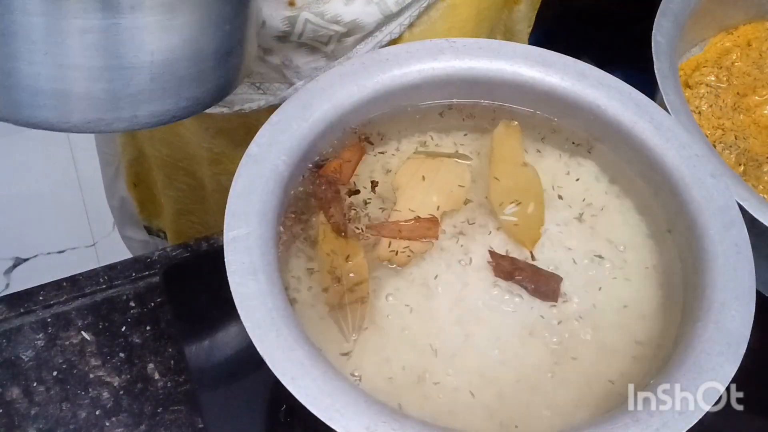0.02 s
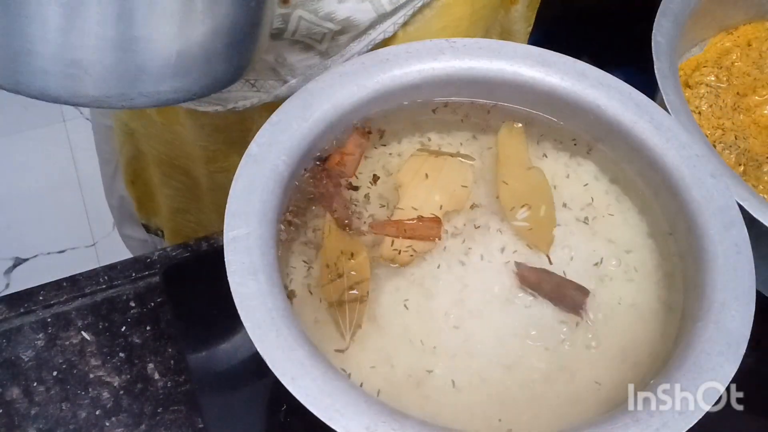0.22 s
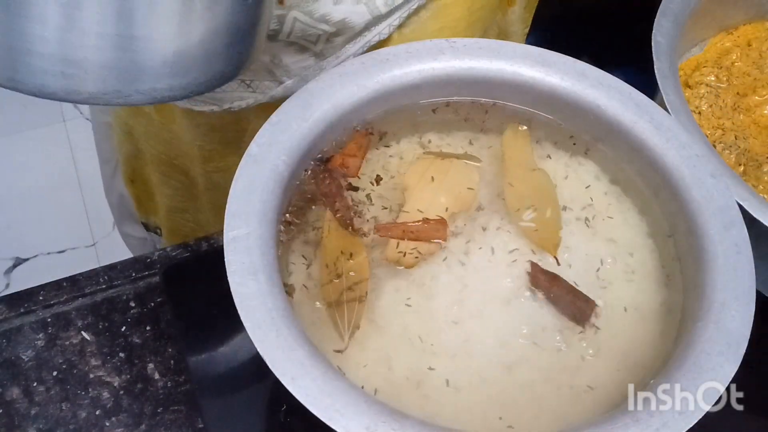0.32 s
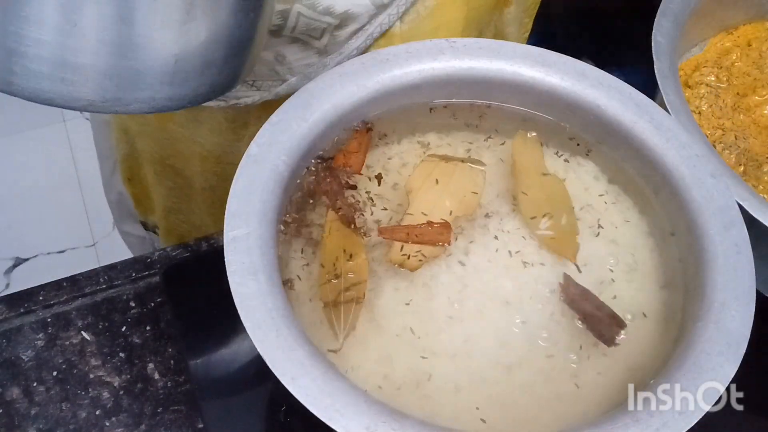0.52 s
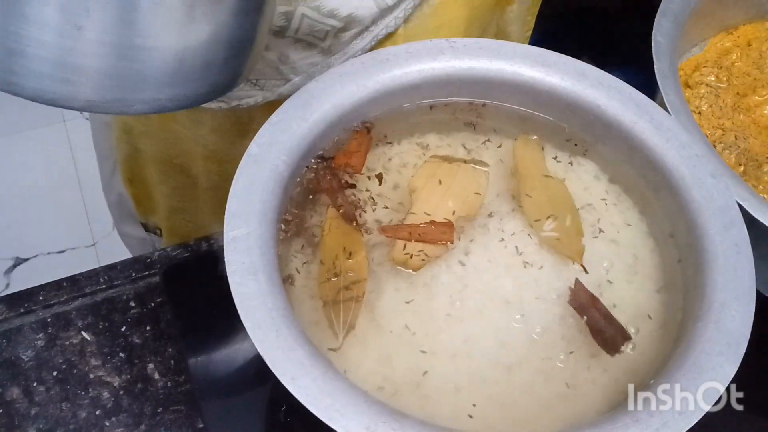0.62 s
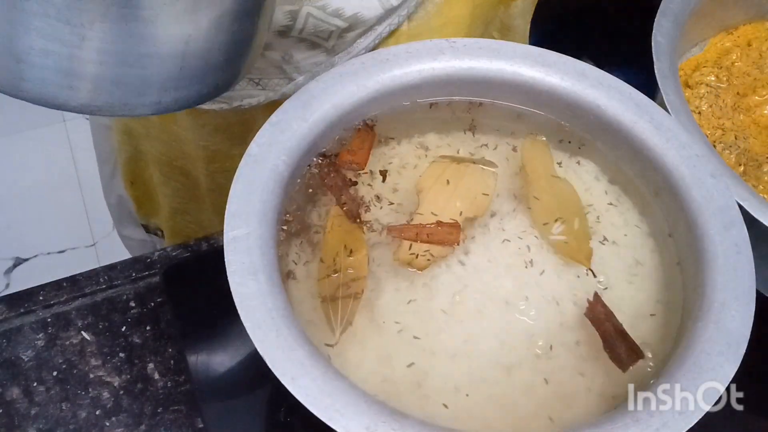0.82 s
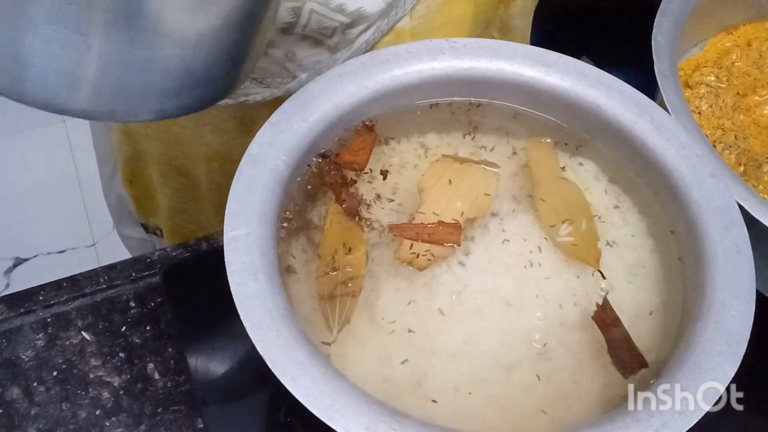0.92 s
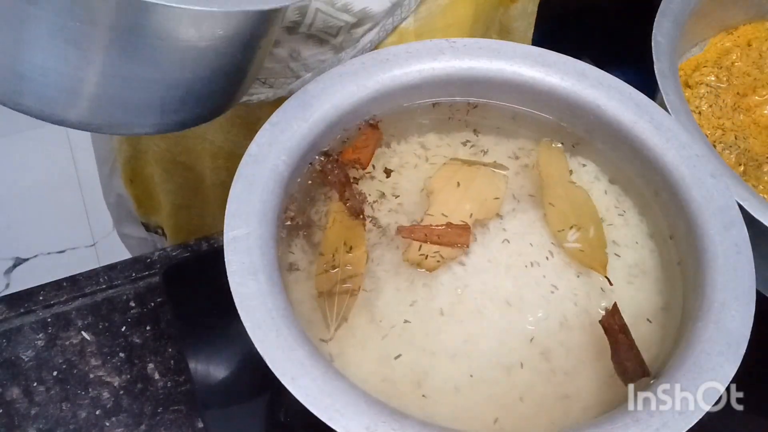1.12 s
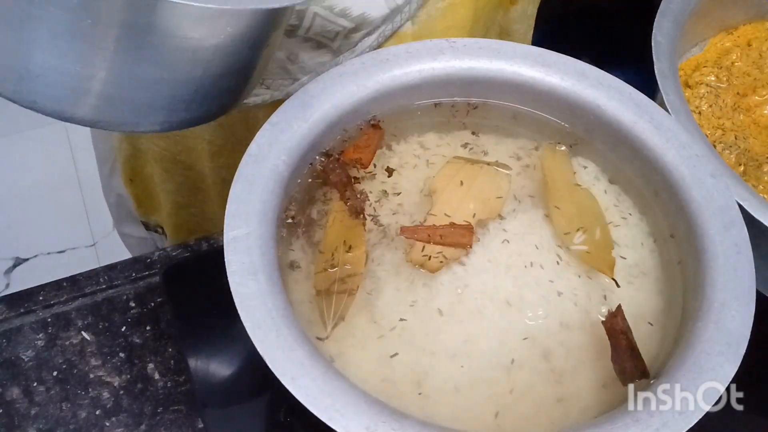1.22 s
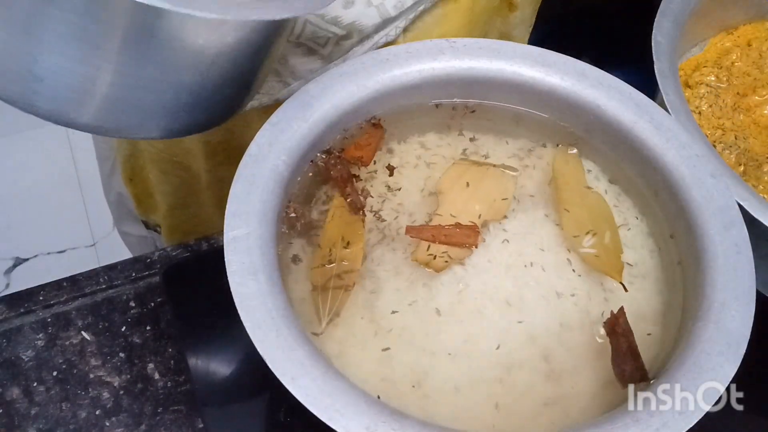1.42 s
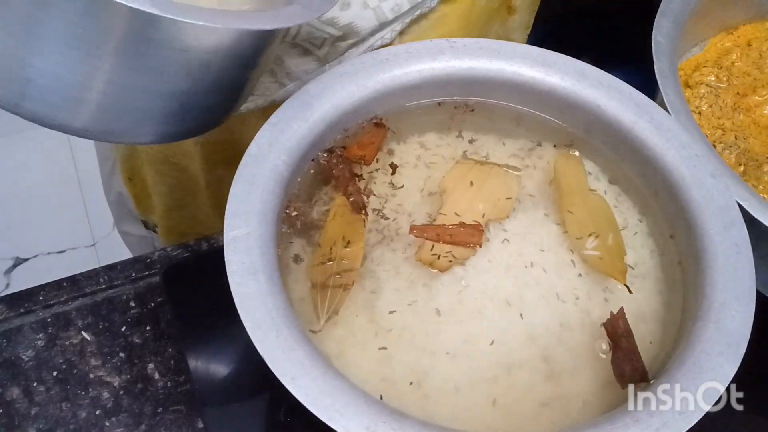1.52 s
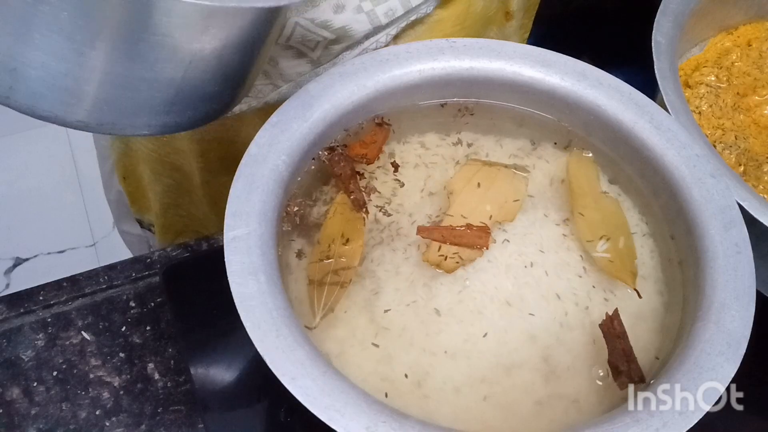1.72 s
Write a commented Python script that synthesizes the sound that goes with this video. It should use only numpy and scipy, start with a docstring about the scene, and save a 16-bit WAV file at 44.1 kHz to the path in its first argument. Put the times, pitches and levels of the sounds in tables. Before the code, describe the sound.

Metal cooking pots clink, scrape and clank together, then wet rice slides inside one.

```python
"""Metal cooking pots are handled close by in a small, hard-walled kitchen.
Over room air, a low rumble and a faint far whistle, one pot clinks against another and both ring.
It is dragged, its base grating and its hollow singing, then clanks down twice among lighter knocks.
Wet rice scrapes and slides in it, the grains rasping on metal and stirring more hollow notes.
A few light rubs follow."""
import sys
import numpy as np
from scipy import signal
from scipy.fft import rfft, irfft
from scipy.io import wavfile
from scipy.ndimage import uniform_filter1d

SR = 44100
rng = np.random.default_rng(int(sys.argv[2]) if len(sys.argv) > 2 else 0)


def put_to_file(sound):
    """Save the sound as 16-bit audio at rate SR, in the file named by the first command-line argument."""
    columns = np.atleast_2d(sound).T  # one column per channel
    safe = np.clip(columns, -1, 1)
    whole_steps = np.round(safe * 32767)
    wavfile.write(sys.argv[1], SR, whole_steps.astype(np.int16))


N = 79380
T = np.arange(N) / SR
HZ = np.fft.rfftfreq(N, 1 / SR)


def amp(db):
    """Decibels to gain."""
    return 10 ** (np.asarray(db) / 20)


def unit(x):
    """Scales to rms 1."""
    return x / np.sqrt(np.mean(x ** 2) + 1e-20)


def read(points, hz):
    """Reads a curve on a log-frequency axis."""
    freqs, values = np.transpose(points)
    return np.interp(np.log(hz + 1), np.log(freqs + 1), values)


def swell(points):
    """A fader ride through (time_s, level_db) points, silent outside them."""
    times, db = np.transpose(points)
    return amp(np.interp(T, times, db)) * (T >= times[0]) * (T <= times[-1])


def add(mix, start_s, sound):
    """Mixes a sound in at a time."""
    part = mix[:, max(round(start_s * SR), 0):][:, :sound.shape[-1]]
    part += sound[..., :part.shape[1]]


def through(x, gain):
    """Applies a gain per frequency."""
    return irfft(rfft(x) * gain, N)


def colour(x, points):
    """Equalises by a (freq_hz, gain_db) curve."""
    return through(x, amp(read(points, HZ)))


def die_away(x, decays):
    """Lets each (freq_hz, t60_s) band fade at its own rate."""
    freqs, t60s = np.transpose(decays)
    bands = [through(x, read(np.c_[freqs, solo], HZ)) for solo in np.eye(len(freqs))]
    return sum(band * amp(-60 * T / t60) for band, t60 in zip(bands, t60s))


# How alike left and right are: freq_hz, correlation
LIKENESS = [(60, 0.98), (300, 0.89), (680, 0.62), (1100, -0.33), (2200, -0.21), (5000, -0.12),
            (12000, 0.067)]
def spread(x):
    """Makes two unrelated channels alike in the bass."""
    left, other = rfft(x)
    same = np.clip(read(LIKENESS, HZ), -.99, .99)
    return irfft(np.array([left, same * left + np.sqrt(1 - same ** 2) * other]), N)


def stereo_phase(hz):
    """The phases at which a note reaches the left and the right."""
    apart = np.arccos(np.clip(read(LIKENESS, hz), -1, 1)) * rng.choice([-1, 1])
    return 2 * np.pi * rng.random() + np.array([[0], [apart]])


def noise():
    """Stereo white noise."""
    return spread(rng.standard_normal((2, N)))


# Room air EQ: freq_hz, gain_db
AIR_EQ = [(20, -23), (48, 0), (110, 0.5), (200, -6), (400, -9), (650, -16), (1400, -11), (2300, -25.5),
          (3500, -13.5), (6000, -25), (9000, -30), (13000, -23), (16000, -40)]
# Rumble resonances: pitch_hz, level_db, width_hz
RUMBLE_MODES = [(51, -22.5, 8.8), (78, -4, 13)]
# Rumble EQ: freq_hz, gain_db
RUMBLE_EQ = [(40, -15), (90, -12), (200, -26)]
# Rumble fader ride: time_s, gain_db
RUMBLE_RIDE = [(0, 2), (.17, -16), (.28, 11), (.7, 2), (1.25, 3.5), (1.45, -14), (1.66, 5), (1.8, 1)]
def room_tone():
    """A bed of quiet air and a lumpy low rumble."""
    air_db, rumble_db = -61, -62.5
    rumble = unit(colour(resonate(noise(), RUMBLE_MODES), RUMBLE_EQ))
    ride_db = np.interp(T, *np.transpose(RUMBLE_RIDE))
    air = unit(colour(noise(), AIR_EQ))
    return amp(air_db) * air + amp(rumble_db + ride_db) * rumble


def resonate(x, modes):
    """Drives (pitch_hz, level_db, width_hz) modes; white noise of rms 1 gives each its level."""
    out = 0
    for hz, db, width_hz in modes:
        radius = np.exp(-np.pi * abs(width_hz) / SR)
        pole = radius * np.exp(2j * np.pi * hz / SR)
        out += amp(db) * np.sqrt(2 * (1 - radius ** 2)) * signal.lfilter([1], [1, -pole], x).real
    return out


# Whistle cues: start_s, length_s, from_hz, to_hz, level_db
WHISTLES = [(0, 0.041, 1583, 1516, -62), (0.04, 0.39, 1576, 1600, -64), (0.063, 0.052, 4030, 3570, -63),
            (0.565, 0.2, 1670, 1740, -61)]
def far_whistles():
    """Thin wavering tones from far away that glide and settle."""
    waver_hz, glide_share = 57, 0.254
    out = np.zeros((2, N))
    for start_s, length_s, from_hz, to_hz, db in WHISTLES:
        progress = np.clip(T / length_s, 0, 1)
        waver = unit(uniform_filter1d(rng.standard_normal(N), size=110))
        hz = to_hz + (from_hz - to_hz) * np.exp(-progress / glide_share) + waver_hz * waver
        arch = np.sqrt(2 * abs(np.sin(np.pi * progress)))
        add(out, start_s, amp(db) * arch * np.sin(2 * np.pi * np.cumsum(hz) / SR))
    return out


def metal_ripple():
    """Thin metal's many small resonances, as fine peaks and dips in gain that flatten in the bass."""
    depth_db, spacing_hz = 2.5, 55.29
    knots = np.arange(0, SR, spacing_hz)
    ripple = np.interp(HZ, knots, rng.standard_normal(4096)[:len(knots)])
    return amp(depth_db * ripple * np.clip(HZ / 2500, 0, 1))


# Dense clatter of a hit: freq_hz, gain_db, t60_s
CLATTER = [(140, -34.5, 1), (327, -19, 0.69), (700, -17, 0.75), (846, -21.5, 0.55), (1530, -10.5, 0.67),
           (2070, -18.5, 0.61), (3750, -18.5, 0.55), (7730, -19.5, 0.38), (8050, -27, 0.42),
           (12800, -18.5, 0.27), (15900, -30, .3)]
# Ring of the lower pot: pitch_hz, level_db, t60_s
LOWER_POT = [(337.6, -35, 0.24), (478, -40, 0.68), (687.7, -22, 0.32), (950, -32, 0.62), (1348, -26, 0.43),
             (1667, -28, 0.57), (1890, -33, 0.29), (2416, -34, 0.64), (2673, -31.5, 0.19),
             (3050, -28, 0.28), (4040, -32, 0.37)]
# Ring of the upper pot: pitch_hz, level_db, t60_s
UPPER_POT = [(663, -36, 0.56), (1064, -31.5, 0.21), (1527, -27.5, 0.31), (1765, -49, 0.28)]
# Bright ring of the rim: pitch_hz, level_db, t60_s
RIM = [(2343, -35.5, 0.33), (3100, -39.5, 0.35), (3644, -31.5, 0.3), (3830, -28.5, 0.16),
       (4170, -31.5, 0.33), (4750, -32, 0.28), (5000, -30.5, 0.3), (5500, -31, 0.18), (5910, -36, 0.17)]
# Centres of each hit's five EQ bands, bass to treble: freq_hz
KNOCK_BANDS_HZ = [400, 1100, 2500, 4300, 12000]
# Pot hits: start_s, level_db, bass_db, low_mid_db, mid_db, presence_db, treble_db,
# crack_db, lower_pot_db, upper_pot_db, rim_db
KNOCKS = [(0.2184, -0.5, -8.5, -11, -8, -1.5, -5, 11, -27.5, -6.5, -1),
          (0.6741, -9, -7.5, -2.5, -1.5, 0, 1, 6.5, -24, 2, -8),
          (0.7528, -1.5, -4, -1, 1.5, 1.5, -1.5, 6.5, -0.5, -5, -24),
          (.808, -12.5, -4, 5.5, 2, 3, -2, 3, -7, 11.5, -15),
          (0.969, -15, -26, 7.5, -11, 1, -8.5, 6, -13, -15, -4)]
def pot_knocks(metal):
    """Pot strikes pot: a contact tick, a bright crack, dense clatter and ringing pots and rim."""
    rise_s, crack_s, crack_hz = 0.00074, 0.0048, 3740
    tick_db, tick_hz, tick_s, tick_lag_s = -19, 5730, 0.000191, 0.00084
    clatter_db = read([(hz, db) for hz, db, _ in CLATTER], HZ)
    highpass = signal.butter(2, crack_hz, "high", fs=SR, output="sos")
    attack = 1 - np.exp(-T / rise_s)
    # The tick lands later and softer on the right.
    tick_t = T - np.array([[0], [tick_lag_s]]) - 2 * tick_s
    tick = amp([[0], [-7]]) * np.exp(-(tick_t / tick_s) ** 2) * np.sin(2 * np.pi * tick_hz * tick_t)
    out = np.zeros((2, N))
    for start_s, db, *bands_db, crack_db, lower_db, upper_db, rim_db in KNOCKS:
        eq_db = read(np.c_[KNOCK_BANDS_HZ, bands_db], HZ)
        body = through(noise(), metal * amp(clatter_db + eq_db))
        clatter = die_away(body, [(hz, t60) for hz, _, t60 in CLATTER])
        crack = amp(crack_db) * signal.sosfilt(highpass, body[:, ::-1]) * np.exp(-T / crack_s)
        pots = amp(lower_db) * ring(LOWER_POT) + amp(upper_db) * ring(UPPER_POT)
        rim = amp(rim_db) * ring(RIM)
        hit = (clatter + crack + pots + rim) * attack + amp(tick_db + crack_db) * tick
        add(out, start_s, amp(db) * hit)
    return out


def ring(modes):
    """Struck metal: each mode beats against a softer, slightly flat twin as it dies away."""
    twin_db, flat_share = -8, 0.0181
    out, t = np.zeros((2, N)), T[:N // 3]
    for hz, db, t60 in modes:
        phase = stereo_phase(hz)
        tone = np.sin(2 * np.pi * hz * t + phase)
        twin = amp(twin_db) * np.sin(2 * np.pi * hz * (1 - flat_share) * t + phase)
        add(out, 0, amp(db - 60 * t / t60) * (tone + twin))
    return out


# Notes that sing out as the pot and its wet load shift: start_s, driven_s, pitch_hz, level_db
HOLLOW_NOTES = [(.33, 0.052, 274, -46.5), (.358, .04, 705, -40.5), (.385, 0.033, 326, -43),
                (0.384, 0.029, 1020, -40.5), (.395, .04, 528, -37), (.403, 0.02, 666, -36),
                (0.399, 0.061, 1765, -40.5), (0.441, 0.033, 1230, -40.5), (0.456, 0.059, 920, -41),
                (1.02, 0.042, 1605, -36), (1.05, 0.04, 526, -45), (1.116, 0.047, 1270, -41.5),
                (1.205, 0.045, 722, -41), (1.21, 0.038, 632, -37.5), (1.222, 0.021, 1390, -32.5),
                (1.25, .035, 556, -36.5), (1.28, 0.042, 1632, -42)]
def hollow_notes():
    """Each fluttering note swells and creeps upward while it is driven, then rings out."""
    rise_s, t60_s, glide_per_s = 0.018, 0.32, 0.067
    flutter_depth, flutter_hz = 0.26, 45
    lowpass = signal.butter(2, flutter_hz, fs=SR, output="sos")
    out, t = np.zeros((2, N)), T[:N // 4]
    for start_s, driven_s, hz, db in HOLLOW_NOTES:
        flutter = flutter_depth * unit(signal.sosfilt(lowpass, rng.standard_normal((2, len(t)))))
        attack = np.sin(np.pi / 2 * np.minimum(t / rise_s, 1)) ** 2
        release = amp(-60 * np.maximum(t - driven_s, 0) / t60_s)
        turns = np.cumsum(hz * (1 + glide_per_s * np.minimum(t, driven_s))) / SR
        tone = np.sin(2 * np.pi * turns + stereo_phase(hz) + flutter[::-1])
        add(out, start_s, amp(db) * attack * release * (1 + flutter) * tone)
    return out


def grit():
    """Dense tiny slips and grain impacts of uneven size."""
    grains_per_s, spread_db = 6000, 3
    size = amp(spread_db * np.minimum(rng.exponential(1, (2, N)), 4))
    polarity = rng.choice([-1., 1.], (2, N))
    hits = rng.random((2, N)) < grains_per_s / SR
    return unit(spread(size * polarity * hits))


# Grating EQ: freq_hz, gain_db
DRAG_EQ = [(150, -14), (300, -8.5), (600, 1), (1400, 10), (2100, 0.5), (3000, 5.5), (4800, 3.5),
           (7500, -7.5), (9000, -14.5), (13000, -8.5), (16000, -21)]
# Drag fader ride: time_s, gain_db
DRAG_RIDE = [(.345, -19), (.385, -4.5), (.411, 5.5), (.472, 3), (.498, -7), (.54, -17), (.58, -26)]
def pot_drag(metal):
    """The pot's base grates along in tiny slips."""
    grating = unit(colour(through(grit(), metal), DRAG_EQ))
    return amp(-38.5) * grating * swell(DRAG_RIDE)


# Gritty rasp EQ: freq_hz, gain_db
RASP_EQ = [(150, -28), (480, -2.5), (850, -7), (1100, 0), (1600, 5.5), (2300, -3.5), (3900, -3), (6500, -8),
           (9000, -18.5), (12500, -16), (16000, -24)]
# Resonances of the pot's hollow: pitch_hz, level_db, width_hz
HOLLOW_MODES = [(564, 2.5, 43), (660, 5.5, 39), (718, 3, 12)]
# Hollow body EQ: freq_hz, gain_db
HOLLOW_EQ = [(100, -36), (350, -11), (500, 0.5), (740, -1), (900, -15.5), (2500, -28)]
# Fader rides of the two rice layers: time_s, rasp_db, hollow_db
RICE_RIDE = [(0.961, -50, -79), (0.974, -40.5, -47.5), (1.041, -37.5, -48.5), (1.11, -39, -51),
             (1.185, -37, -44), (1.23, -35.5, -34), (1.275, -39, -38.5), (1.332, -43, -50.5),
             (1.36, -51, -50.5), (1.419, -53.5, -59.5)]
def rice_slide(metal):
    """Wet grains rasp over metal and stir the hollow of the pot."""
    rasp = unit(colour(through(grit(), metal), RASP_EQ))
    hollow = unit(colour(resonate(grit(), HOLLOW_MODES), HOLLOW_EQ))
    times, rasp_db, hollow_db = np.transpose(RICE_RIDE)
    return rasp * swell(np.c_[times, rasp_db]) + hollow * swell(np.c_[times, hollow_db])


# Soft scrape EQ: freq_hz, gain_db
RUB_EQ = [(150, -24), (600, 6.5), (900, -2), (1700, 1.5), (3000, -3), (6000, -3.5), (9000, -16),
          (16000, -20)]
# Rub cues: start_s, length_s, level_db, resonance_hz, resonance_db
RUBS = [(1.445, 0.09, -49.5, 1750, -16), (1.56, 0.051, -53, 670, -12.5), (1.614, 0.081, -56, 2280, -4),
        (1.645, 0.12, -74.5, 2860, 13.5), (1.747, 0.036, -77.5, 1940, 19.5)]
def light_rubs(metal):
    """Short soft scrapes on the metal, each with one resonance."""
    width_hz = 150
    out = np.zeros((2, N))
    for start_s, length_s, db, hz, resonance_db in RUBS:
        arch = np.sin(np.pi * np.clip((T - start_s) / length_s, 0, 1) ** 0.52)  # peaks early
        friction = through(grit(), metal)
        scrape = unit(colour(friction, RUB_EQ))
        out += amp(db) * arch * (scrape + resonate(friction, [(hz, resonance_db, width_hz)]))
    return out


# Kitchen reverb decay: freq_hz, t60_s
ROOM_DECAY = [(100, 0.37), (500, 0.2), (1700, 0.36), (4500, 0.23), (12000, 0.21)]
def kitchen(x):
    """Adds the short tail of hard walls."""
    wet_db, predelay_s = -0.5, 0.004
    tail = die_away(noise(), ROOM_DECAY) * (T > predelay_s)
    wet = signal.fftconvolve(x, tail / np.linalg.norm(tail[0]), axes=1)[:, :N]
    return x + amp(wet_db) * wet


def scene():
    """Knocks and notes stay dry; scrapes and whistles share the reverb; room tone lies under all."""
    metal = metal_ripple()
    ringing = pot_knocks(metal) + hollow_notes()
    reverb_bus = pot_drag(metal) + rice_slide(metal) + light_rubs(metal) + far_whistles()
    return ringing + kitchen(amp(-2.0) * reverb_bus) + room_tone()


# Stereo tilt of the microphone: freq_hz, left_over_right_db
BALANCE = [(60, 6.5), (130, 3), (350, 3), (650, -0.5), (1100, 3.5), (2200, 3.5), (5000, 5), (8000, -4.5),
           (12000, -2)]
def record(dry):
    """Each microphone port has its own colour; then a low cut and a steep high cut."""
    low_cut_hz, high_cut_hz = 25, 16100
    half_db = read(BALANCE, HZ) / 2
    ports = through(dry, amp([half_db, -half_db]))
    low_cut = signal.butter(4, low_cut_hz, "high", fs=SR, output="sos")
    high_cut = signal.firwin(255, high_cut_hz, window=("kaiser", 9), fs=SR)
    return signal.oaconvolve(signal.sosfilt(low_cut, ports), high_cut[None], "same")


dry = scene()
out = record(dry)
put_to_file(out)
```